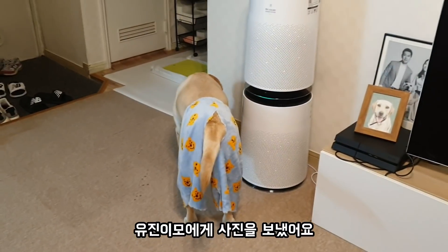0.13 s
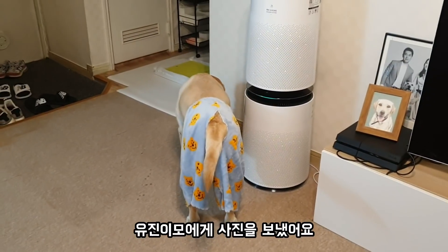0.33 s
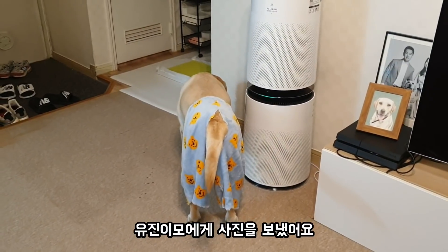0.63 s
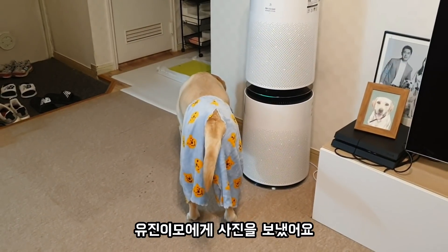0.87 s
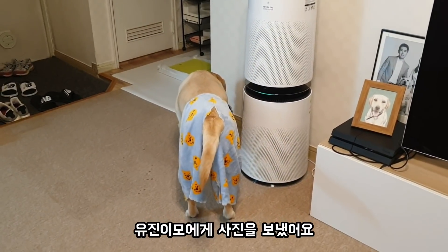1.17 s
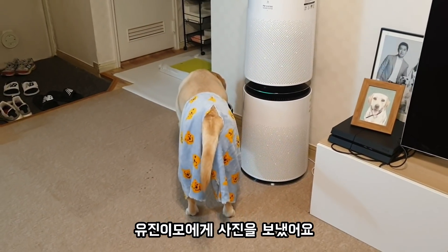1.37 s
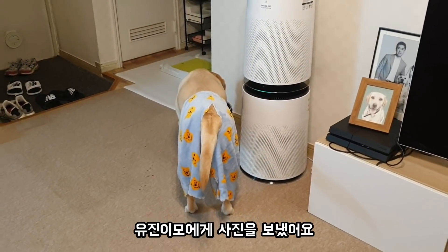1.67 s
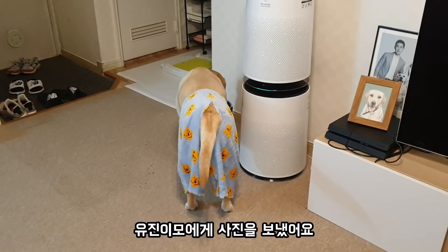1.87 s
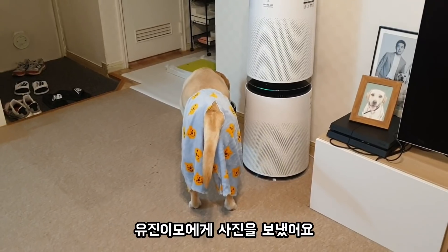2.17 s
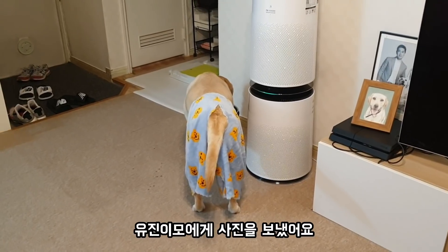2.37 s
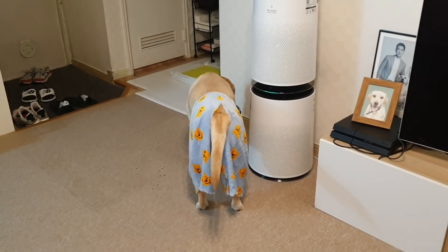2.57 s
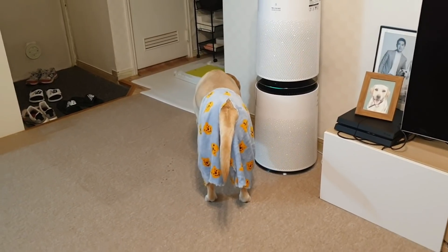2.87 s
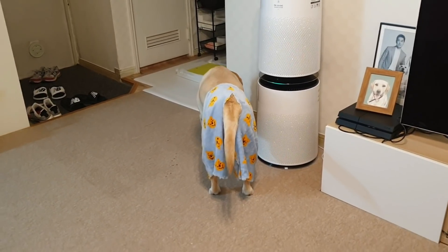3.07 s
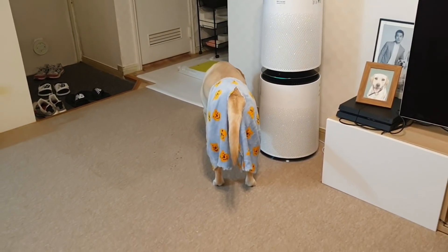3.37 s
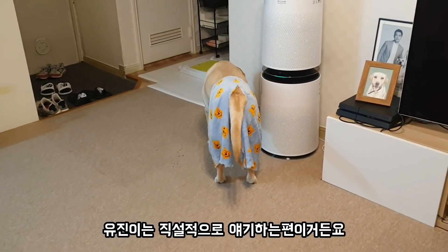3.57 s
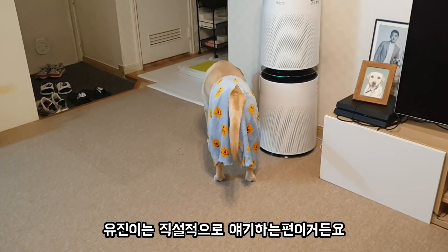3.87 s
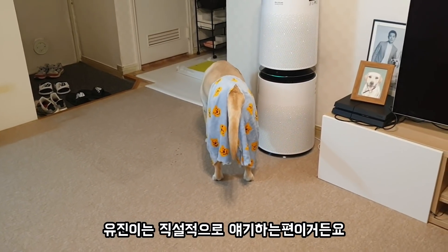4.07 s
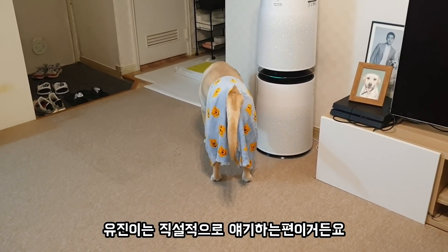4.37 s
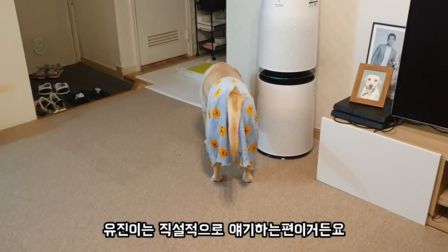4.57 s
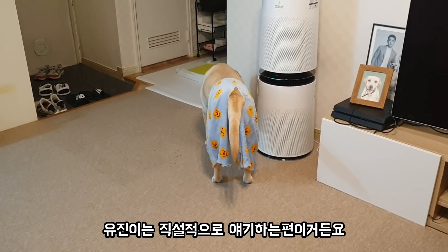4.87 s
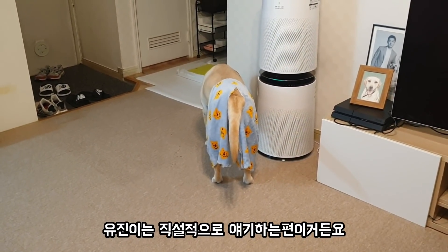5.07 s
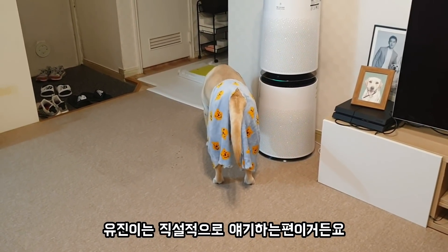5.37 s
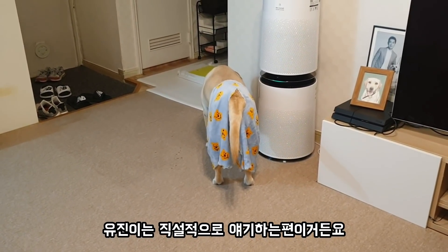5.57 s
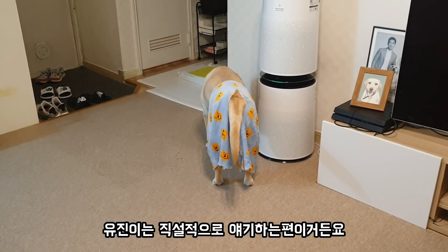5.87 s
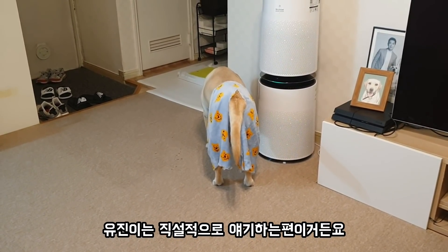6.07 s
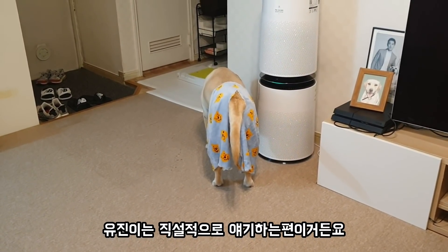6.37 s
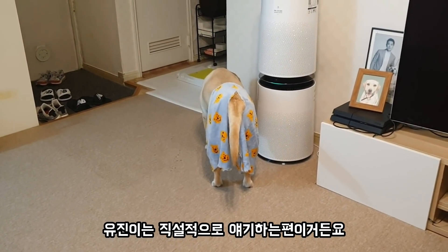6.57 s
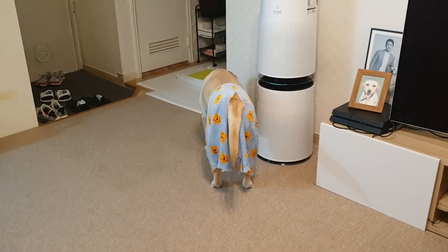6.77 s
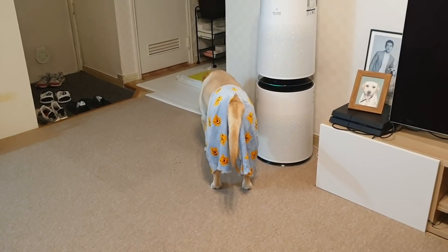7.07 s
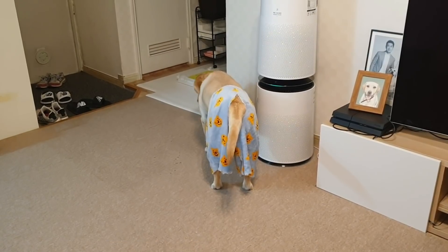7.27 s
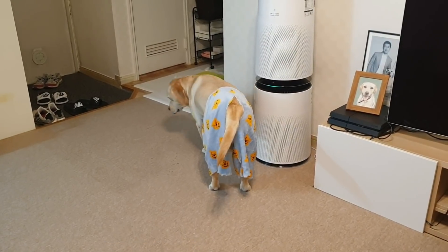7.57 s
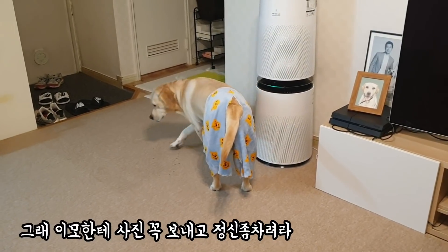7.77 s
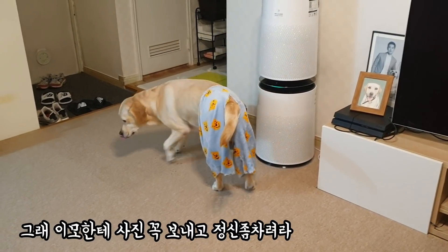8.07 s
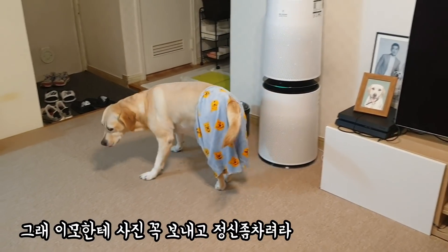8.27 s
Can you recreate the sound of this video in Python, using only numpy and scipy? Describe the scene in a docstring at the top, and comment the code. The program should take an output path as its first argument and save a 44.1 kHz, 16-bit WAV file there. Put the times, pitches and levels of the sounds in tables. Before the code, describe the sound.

Wet lip smacks and small bubbles, a short pause, then a dog laps water for about five seconds: tongue slaps, round gurgles, bright pops as the tongue pulls out, and lower plops of closing jaws. The bowl adds a slight ring. It stops, quietly licks its lips and moves with a faint rustle. Soft purifier airflow and occasional low booms sit beneath, in a small live room heard in stereo.

```python
"""A quiet living room: a dog laps water from a bowl, a little over two licks a second, then licks its lips.
In each lick the tongue slaps the water and stirs up big bubbles, then a cavity plops as it pulls back;
most licks end with a plop of the closing jaws, usually lower. Sprays are showers of ringing bubble grains,
plops are short gliding sines, and the bowl and the room colour them. A jacket rustles, low booms swell
and die away, and an air purifier hums: shaped noise with narrow resonances."""
import sys
import numpy as np
from scipy import signal
from scipy.fft import rfft, irfft, next_fast_len
from scipy.io import wavfile

SR = 44100
rng = np.random.default_rng(int(sys.argv[2]) if len(sys.argv) > 2 else 0)


def master_out(mix):
    """Clip the mix to full scale and print it as 16-bit PCM to the path in sys.argv[1]."""
    frames = np.transpose(np.atleast_2d(mix))
    ceiling = np.clip(frames, -1, 1)
    pcm = np.round(ceiling * 32767).astype(np.int16)
    wavfile.write(sys.argv[1], SR, pcm)


N = 370748   # samples, about 8.4 s
# All levels in dB are relative; a t60 is the time a sound takes to fall by 60 dB.


def lapping():
    """Slap, slosh, pull and jaw snap of the licks, with lip smacks and further bubbles."""
    sprays, gurgles, pockets = [], [], []
    tongue_slaps(sprays, gurgles, pockets)
    tongue_pulls(sprays, pockets)
    jaw_snaps(sprays, pockets)
    lip_smacks(sprays, gurgles)
    further_bubbles(pockets)
    return splashes(sprays) + sloshes(gurgles) + plops(pockets)


# The licks: the tongue brushes the water, slaps it and stirs it. Each row: start in seconds, slap in dB,
# body near 1 kHz in dB, fizz above 8 kHz in dB, rise in seconds, fade t60 in seconds, brush in dB,
# air pocket in dB, pocket pitch in Hz, slosh in dB, slosh pitch in Hz.
LICKS = [(1.287, -47.5, 4.5, -0.5, 0.0016, 0.16, -49.5, -45, 900, -42, 510),
         (1.690, -52, 2, 2, 0.012, 0.46, -46.5, -55, 735, -54.5, 420),
         (2.176, -39, 3.5, -3.5, 0.0042, 0.17, -61, -32, 920, -45, 617),
         (2.574, -41, 4.5, 6.5, 0.0094, 0.28, -79, -24, 1424, -35, 322),
         (3.093, -35, 1, 8, 0.019, 0.13, -53.5, -34.5, 1160, -37.5, 469),
         (3.499, -37, -4.5, 8, 0.00096, 0.13, -57.5, -29, 1570, -37.5, 472),
         (4.007, -41, 0, -1, 0.00069, 0.15, -51, -50, 1130, -40, 460),
         (4.409, -50.5, 1.5, 6, 0.017, 0.47, -62, -54, 1785, -46.5, 379),
         (4.908, -39.5, 0.5, -4, 0.0074, .2, -54.5, -36.5, 2760, -38.5, 350),
         (5.329, -47, -1, 2, 0.021, 0.23, -53.5, -52, 1340, -42.5, 452),
         (5.841, -36, -2, -15, 0.0062, 0.18, -77, -33.5, 920, -40.5, 580),
         (6.260, -41.5, -7, -16, 0.0015, 0.29, -49, -29.5, 1213, -45.5, 555)]
# Colour of the brush and of the slap, in dB near 1, 2.2, 5 and 11 kHz.
BRUSH_COLOUR_DB = (-1, 5, -16, -10)
SLAP_COLOUR_DB = (0, 2.5, -.5, -8)
BRUSH_LEAD_S, BRUSH_RISE_S, BRUSH_T60_S = 0.021, 0.013, 0.22   # light contact just ahead of the slap
POCKET_T60_S = 0.019   # ring of the air pocket trapped under the tongue
SLOSH_LAG_S, SLOSH_T60_S = 0.014, 0.093   # the water moves just after the slap
DEEP_DB, DEEP_HZ = -8, 256   # a deeper gurgle under each slosh


def tongue_slaps(sprays, gurgles, pockets):
    """The tongue sprays droplets, traps an air pocket and stirs up large bubbles."""
    for (s, db, body_db, fizz_db, rise, fade, brush_db,
         pocket_db, pocket_hz, slosh_db, slosh_hz) in LICKS:
        slap_colour = np.add(SLAP_COLOUR_DB, [body_db, 0, 0, fizz_db])
        sprays.append((s - BRUSH_LEAD_S, brush_db, *BRUSH_COLOUR_DB, BRUSH_RISE_S, BRUSH_T60_S))
        sprays.append((s, db, *slap_colour, rise, fade))
        pockets.append((s, pocket_db, pocket_hz, POCKET_T60_S))
        gurgles.append((s + SLOSH_LAG_S, slosh_db, slosh_hz, SLOSH_T60_S))
        gurgles.append((s + SLOSH_LAG_S, slosh_db + DEEP_DB, DEEP_HZ, SLOSH_T60_S))


# The pulls, 40 to 80 ms after the slaps. Each row: start in seconds, spray in dB, brightest pitch in Hz,
# fade t60 in seconds, plop in dB, plop pitch in Hz, ring t60 in seconds.
PULLS = [(1.345, -45, 2200, 0.24, -31.5, 1620, 0.014), (1.730, -61, 1500, 0.18, -29, 1350, 0.017),
         (2.243, -36, 4220, .11, -37, 1770, 0.034), (2.637, -36.5, 2400, 0.16, -21.5, 1880, 0.0099),
         (3.155, -40.5, 5760, 0.2, -31, 1910, 0.0096), (3.577, -42, 3100, 0.23, -26, 1590, 0.0068),
         (4.076, -40, 2200, 0.11, -31.5, 1474, 0.022), (4.485, -49, 3200, 0.26, -31, 1820, 0.016),
         (4.972, -43, 4600, 0.2, -37, 1810, 0.016), (5.386, -48.5, 4500, 0.2, -25, 1630, 0.0054),
         (5.923, -43, 2400, 0.16, -44, 3070, .015), (6.325, -48.5, 2400, 0.17, -20.5, 1690, 0.0086)]
# Colour of the falling water before its brightest pitch is set, in dB near 1, 2.2, 5 and 11 kHz.
PULL_COLOUR_DB = (-2.5, -1, -2, -1)
PULL_RISE_S = 0.002


def tongue_pulls(sprays, pockets):
    """The tongue pulls out: the cavity behind it plops and water falls back as spray."""
    for s, spray_db, brightest_hz, fade, plop_db, hz, ring in PULLS:
        sprays.append((s, spray_db, *focused(PULL_COLOUR_DB, brightest_hz), PULL_RISE_S, fade))
        pockets.append((s, plop_db, hz, ring))


# The jaws, about 150 ms after the slaps. Each row: start in seconds, spray in dB, plop in dB,
# plop pitch in Hz, ring t60 in seconds.
JAWS = [(1.440, -51.5, -22.5, 1290, 0.0044), (1.821, -47.5, -30, 1010, 0.0086),
        (2.327, -43.5, -41.5, 1430, 0.017), (2.718, -42.5, -22, 1270, 0.0065),
        (3.243, -41.5, -32.5, 1147, 0.013), (4.154, -39.5, -34.5, 1170, 0.017),
        (5.067, -53.5, -28.5, 1270, 0.011), (5.486, -49.5, -33.5, 2050, 0.0082),
        (5.997, -66, -22.5, 990, 0.0037), (6.419, -49, -41, 1750, 0.014)]
# Colour of the jaw spray, in dB near 1, 2.2, 5 and 11 kHz.
JAW_COLOUR_DB = (4.5, 1, -4, -8.5)
JAW_RISE_S, JAW_T60_S = 0.0098, 0.083


def jaw_snaps(sprays, pockets):
    """The jaws shut on the water with a spray and a double plop of enclosed air."""
    for s, spray_db, plop_db, hz, ring in JAWS:
        sprays.append((s, spray_db, *JAW_COLOUR_DB, JAW_RISE_S, JAW_T60_S))
        pockets += paired(s, plop_db, hz, ring)


# Wet lip smacks before and after drinking. Each row: start in seconds, level in dB, brightest pitch in Hz,
# fizz above 8 kHz in dB, rise in seconds.
SMACKS = [(0.018, -48, 1000, 13, 0.013), (0.463, -53.5, 6000, 4, 0.016), (0.501, -46, 4080, -7, 0.0013),
          (0.810, -51.5, 899, 12, 0.0051), (0.857, -44.5, 3750, 2.5, .006), (0.899, -47, 2560, -12, 0.0048),
          (6.832, -51, 2720, 2.5, 0.0059), (7.008, -57.5, 5000, -8, 0.0058), (7.348, -61, 3800, 0, 0.017),
          (7.459, -57, 3400, -22, .01), (7.794, -55, 3400, 1.5, 0.011), (7.939, -60, 4450, 5.5, 0.0019),
          (8.276, -53.5, 5240, -2, 0.0045)]
# Colour of the smacks before their brightest pitch is set, in dB near 1, 2.2, 5 and 11 kHz.
SMACK_COLOUR_DB = (-5, -0.5, 0.5, -1.5)
SMACK_T60_S = 0.24
MOUTH_DB, MOUTH_HZ, MOUTH_T60_S = -14, 655, 0.41   # each smack also gurgles in the mouth


def lip_smacks(sprays, gurgles):
    """Wet lips part in a spray of fine bubbles over a gurgle in the mouth."""
    for s, db, brightest_hz, fizz_db, rise in SMACKS:
        colour = focused(SMACK_COLOUR_DB, brightest_hz) + [0, 0, 0, fizz_db]
        sprays.append((s, db, *colour, rise, SMACK_T60_S))
        gurgles.append((s, db + MOUTH_DB, MOUTH_HZ, MOUTH_T60_S))


# Further bubbles, within the licks and between them. Each row: start in seconds, level in dB, pitch in Hz.
FURTHER_BUBBLES = [(0.055, -38, 1365), (0.273, -47, 1390), (0.502, -37.5, 1775), (0.710, -45, 1432),
                   (0.723, -44, 744), (1.349, -36.5, 2540), (1.694, -38, 8290), (2.578, -24.5, 977),
                   (3.504, -33.5, 6410), (4.006, -39.5, 4820), (4.08, -38.5, 2850), (5.848, -29, 2680),
                   (5.886, -34, 990), (5.925, -47, 8000), (6.838, -53, 3120), (6.840, -49.5, 1110),
                   (7.460, -56.5, 2480), (7.463, -48.5, 4490), (7.789, -52.5, 3150), (7.973, -53, 1360),
                   (8.207, -45, 6770), (8.272, -42.5, 1440)]
FURTHER_RING_S = 0.017   # t60


def further_bubbles(pockets):
    """Further bubbles, within the licks and between them, each with a higher, weaker follower."""
    for s, db, hz in FURTHER_BUBBLES:
        pockets += paired(s, db, hz, FURTHER_RING_S)


GULP_LAG_S, GULP_DB, GULP_OCTAVES = 0.018, -7, 0.15


def paired(s, db, hz, ring):
    """An air pocket and the weaker, higher one that follows it."""
    return [(s, db, hz, ring), (s + GULP_LAG_S, db + GULP_DB, hz * 2 ** GULP_OCTAVES, ring)]


# Anchor pitches of every spray colour, in Hz.
COLOUR_HZ = [1000, 2200, 5000, 11000]
FOCUS_DB_PER_OCTAVE = 5


def focused(colour_db, brightest_hz):
    """Tilt a spray's colour down on both sides of its brightest pitch."""
    octaves_away = np.abs(np.log2(np.array(COLOUR_HZ) / brightest_hz))
    return np.array(colour_db) - FOCUS_DB_PER_OCTAVE * octaves_away


def splashes(sprays, level_db=-12.5, clump_db=4.5, clump_s=0.0049, patchy_db=2.0,
             touch_s=0.014, touch_db=-15, top_db=-4, smack_db=-2.0, smack_s=0.0021):
    """A soft touch, then a smack: a quickly fading shower of tiny bubbles and droplets."""
    out, t = np.zeros(N), seconds(0.3)
    colour_hz = COLOUR_HZ + [15000]
    since = np.maximum(t - touch_s, 0)   # time since the smack
    touch = amp(touch_db) * np.minimum(t / touch_s, 1) ** 2
    smack = 1 + amp(smack_db) * np.exp(-since / smack_s)
    for s, peak_db, *colour_db, rise, fade in sprays:
        pitches = np.geomspace(620, 14500, 26) * 2 ** rng.uniform(-0.06, 0.06, 26)
        onset = 1 - np.exp(-since / max(rise, 1e-4))
        envelope = (touch + smack * onset) * amp(-60 * since / max(fade, 0.01))
        energy = np.sqrt(np.mean(envelope ** 2))
        envelope = envelope * clumping(t, clump_db, clump_s)
        colour = np.interp(np.log(pitches), np.log(colour_hz), colour_db + [colour_db[-1] + top_db])
        patchy_colour = colour + patchy_db * rng.standard_normal(len(pitches))
        for hz, db in zip(pitches, patchy_colour):
            # bubbles of each size come in flurries of their own, so the colour keeps changing
            flurries = energy * rms_one(envelope * clumping(t, depth_db=3.0, clump_s=0.01254))
            shower = grains(flurries, hz, per_s=210, cycles=29.0, spread_db=6.0)
            add(out, s - touch_s, amp(peak_db + level_db + db) * shower)
    return out


def clumping(t, depth_db, clump_s, settle_s=0.029):
    """Bubbles burst in clumps: a random gain whose swings grow to full depth over the first moments."""
    swing_db = depth_db * np.minimum(t / settle_s, 1) ** 2
    jumps = np.interp(t, np.arange(200) * clump_s, rng.standard_normal(200))
    return amp(swing_db * (jumps - 0.25))


def sloshes(gurgles, level_db=-11, rise=0.0026, span_octaves=0.49, glop_db=-1, glop_t60=0.07):
    """The tongue closes one large cavity with a round glop; other bubbles gurgle around its pitch."""
    out, t = np.zeros(N), seconds(0.3)
    for s, peak_db, hz, fade in gurgles:
        add(out, s, amp(peak_db + glop_db) * bubble(hz, glop_t60))
        envelope = (1 - np.exp(-t / rise)) * amp(-60 * t / max(fade, 0.01))
        for octave in np.linspace(-span_octaves, span_octaves, 5):
            gurgle = grains(envelope, hz * 2 ** octave, per_s=220, cycles=13, spread_db=3.0)
            add(out, s, amp(peak_db + level_db) * gurgle)
    return signal.sosfilt(signal.butter(2, 1100, fs=SR, output="sos"), out)   # keep it dark


def plops(pockets, level_db=6.0, rebound_s=0.004, rebound_db=-3, rebound_octaves=0.21,
          fragment_db=-12, scatter_octaves=0.496, breakup_s=0.024, count=5):
    """Each pocket pops, rebounds a little higher, and breaks up into weaker bubbles of other sizes."""
    out = np.zeros(N)
    for s, db, hz, t60 in pockets:
        add(out, s, amp(db + level_db) * bubble(hz, t60))
        rebound = bubble(hz * 2 ** rebound_octaves, 0.5 * t60)
        add(out, s + rebound_s, amp(db + rebound_db) * rebound)
        octaves = np.linspace(-scatter_octaves, scatter_octaves, count) + rng.normal(0, 0.021, count)
        for delay, octave in zip(rng.random(count), octaves):
            fragment = bubble(hz * 2 ** octave, t60)
            add(out, s + delay * breakup_s, amp(db + fragment_db - 2.7 * delay) * fragment)
    return out


def bubble(hz, t60, glide_octaves=0.12):
    """An air pocket opens within about a cycle, rings briefly and rises in pitch."""
    t = seconds(0.08)
    pitch = hz * 2 ** (glide_octaves * (np.minimum(t / t60, 1) - 0.2))
    envelope = (1 - np.exp(-t * hz)) * amp(-60 * t / t60)
    return envelope * np.sin(2 * np.pi * np.cumsum(pitch) / SR)


def grains(envelope, hz, per_s, cycles, spread_db):
    """Grains of one pitch ring at random, 60 dB down after the given cycles, with the envelope's energy."""
    size = len(envelope)
    strength = amp(spread_db * np.minimum(rng.exponential(1, size), 3)) * rng.choice([-1, 1], size)
    clicks = envelope * strength * (rng.random(size) < per_s / SR)
    sound = resonate(clicks, hz, np.log(1000) / np.pi * hz / cycles)
    return rms_one(sound) * np.sqrt(np.mean(envelope ** 2))


# Resonances of the bowl. Each row: pitch in Hz, width in Hz, gain in dB.
BOWL_MODES = [(337, 160, -0.5), (484, 85, 1), (599.5, 8.3, -6.5), (930, 22, -4.5), (1160, 30, -10),
              (2600, 88, -16), (2860, 100, -12), (3220, 73, -7), (3790, 69, -55), (6500, 71, -1),
              (8560, 140, -4), (10600, 180, -2), (12800, 230, -10)]


def bowl(water):
    """The bowl rings along with the water at its own resonances."""
    return water + sum(amp(db) * resonate(water, hz, width) for hz, width, db in BOWL_MODES)


# Soft rustles as the dog moves in its jacket. Each row: start in seconds, level in dB.
RUSTLES = [(0.146, -71.5), (0.246, -71), (0.531, -68), (6.925, -78), (7.294, -74), (8.082, -68),
           (8.349, -66)]
RUSTLE_S, RUSTLE_HZ = 0.097, 6500


def rustles():
    """Cloth slides in short swells of fine crackle."""
    out = np.zeros(N)
    swell = np.hanning(int(RUSTLE_S * SR))
    for s, db in RUSTLES:
        add(out, s, amp(db) * grains(swell, RUSTLE_HZ, per_s=4000, cycles=3.0, spread_db=10.0))
    return out


# Low booms. Each row: start in seconds, level in dB.
BOOMS = [(2.779, -56.5), (3.079, -58.5), (3.699, -58.5), (4.099, -62), (4.93, -60.5), (5.534, -55.5),
         (6.74, -48), (7.53, -60), (7.91, -52.5)]
BOOM_HZ, BOOM_T60_S = 59.8, 0.97


def booms(rise=0.0094):
    """Low booms near 60 Hz swell fast and die slowly: decaying sines, leaning left."""
    out, t = np.zeros(N), seconds(1)
    boom = (1 - np.exp(-t / rise)) * np.sin(2 * np.pi * BOOM_HZ * t)
    for s, db in BOOMS:
        add(out, s, amp(db - 60 * t / BOOM_T60_S) * boom)
    return out * pan(3.0)


# Nearby surfaces. Each row: left delay in seconds, right delay in seconds, gain in dB.
REFLECTIONS = [(.00102, 0.00078, -5.5), (.00207, 0.00096, -6), (.0044, 0.0051, -11.5), (.0051, 0.0043, -7),
               (0.0089, 0.011, -17), (0.0143, 0.017, -6.5)]


def room(x, direct_db=-4.5, move_s=0.025, count=6):
    """Direct sound, dull first echoes and a diffuse pattern that changes as the head and the water move."""
    dull = signal.lfilter([0.6], [1, -0.4], x + 1e-18)
    out = np.array([x, x])
    for *delays, db in REFLECTIONS:
        for side, delay in enumerate(delays):
            add(out[side], delay, amp(db) * dull)
    # the sound wanders between several diffuse responses at constant power
    knots, time = np.arange(1000) * move_s, np.arange(N) / SR
    shares = np.array([np.interp(time, knots, rng.random(len(knots)) ** 4) for _ in range(count)])
    shares = shares / np.sqrt(np.sum(shares ** 2, axis=0))
    diffuse = sum(signal.oaconvolve((x * share)[None], diffuse_response(), axes=1)[:, :N]
                  for share in shares)
    return amp(direct_db) * out + diffuse


# How long the room rings. Each row: frequency in Hz, t60 in seconds.
ROOM_T60 = [(150, 0.66), (500, 0.33), (1400, 0.34), (4000, 0.31), (10000, 0.31), (16000, 0.35)]


def diffuse_response(tail_db=-2.0, build_s=0.0058, early_db=-7, early_t60=0.018):
    """Dense, quickly fading early scatter, and a tail whose decay time depends on frequency."""
    t = seconds(0.5)
    tail, early = 0, 0
    for hz, band in diffuse_bands(len(t)):
        tail = tail + band * amp(-60 * t / at_hz(ROOM_T60, hz))
        early = early + band * amp(-60 * t / early_t60)
    opening = 1 - np.exp(-t / build_s)
    both = amp(tail_db) * rms_one(tail * opening) + amp(early_db) * rms_one(early * opening)
    return both / np.sqrt(len(t))


# How alike the two sides of diffuse sound are. Each row: frequency in Hz, left-right correlation from 0 to 1.
LIKENESS = [(60, 0.65), (250, 1), (500, 0.73), (1000, 0.11), (2000, 0), (16000, 0)]


def diffuse_bands(size):
    """Third-octave bands of stereo noise, most alike on both sides in the bass: yields (Hz, band)."""
    edges = 22 * 2 ** (np.arange(30) / 3)
    white = rng.standard_normal((2, 2, size + SR // 4))   # extra length lets the filters settle
    for k, (low, high) in enumerate(zip(edges, edges[1:])):
        band_filter = signal.butter(2, [low, high], "band", fs=SR, output="sos")
        mid, side = signal.sosfilt(band_filter, white[k % 2])[:, -size:]
        hz = np.sqrt(low * high)
        alike = np.clip(at_hz(LIKENESS, hz), -1, 1)
        yield hz, np.sqrt(1 + alike) * mid + np.sqrt(1 - alike) * side * [[1], [-1]]


# Stereo colour of the bowl and the dog. Each row: frequency in Hz, left minus right in dB.
WATER_BALANCE = [(200, 0), (700, 2.5), (1500, 2.5), (3000, -1.7), (5000, 1), (6400, -1.5), (8400, 0.5),
                 (10400, -10), (15000, -5.5)]


def toward_microphones(x):
    """The two sides hear the bowl in different colours, the right one brighter."""
    size = next_fast_len(N)
    ratio = amp(at_hz(WATER_BALANCE, np.maximum(np.fft.rfftfreq(size, 1 / SR), 1)))
    gains = np.array([ratio, np.ones_like(ratio)]) * np.sqrt(2 / (1 + ratio ** 2))
    return irfft(rfft(x, size) * gains, size)[:, :N]


# Air noise of the purifier and the room. Each row: frequency in Hz, level in dB per Hz.
AIR = [(15, -50), (25, -18), (55, -7.5), (107, -7.5), (297, -5), (433, -11.5), (469, -21.5), (523, -15.5),
       (1110, -20), (1530, -26.5), (2490, -30), (2850, -33), (6920, -39.5), (8580, -40.5), (15500, -35.5)]
# Stereo colour of that noise. Each row: frequency in Hz, left minus right in dB.
AIR_BALANCE = [(60, 5), (250, -0.6), (750, 9.5), (1200, 1), (1800, 7.5), (3000, 1.5), (14000, 1)]
# Narrow hums and a faint whine. Each row: pitch in Hz, width in Hz, level in dB relative to the air noise,
# left minus right in dB.
HUMS = [(62.2, 6, -14.5, 10.5), (219, 22, -10.5, 14.5), (299.6, 25, -11.5, 9), (8280, 190, -28.5, 29)]
# Slow drift of the purifier and air noise. Each row: time in seconds, level in dB.
AIR_LEVEL = [(0.0, -63), (0.37, -61.5), (0.89, -64.5), (2.36, -62), (3.6, -64), (3.75, -65), (6.32, -64),
             (7.33, -65), (8.41, -63)]


def purifier(level_db=2.5):
    """Smooth air noise, with narrow hums made by resonating noise."""
    air = sum(amp(at_hz(AIR, hz)) * pan(at_hz(AIR_BALANCE, hz)) * band
              for hz, band in diffuse_bands(N))
    hums = sum(amp(db) * pan(side_db) * rms_one(resonate(rng.standard_normal(N), hz, width))
               for hz, width, db, side_db in HUMS)
    drift_db = np.interp(np.arange(N) / SR, *np.transpose(AIR_LEVEL))
    return amp(level_db + drift_db) * rms_one(rms_one(air) + hums)


def resonate(x, hz, width_hz):
    """A two-pole resonance with gain 1 at its top."""
    r = np.exp(-np.pi * width_hz / SR)
    feedforward = np.array([1, 0, -1]) * (1 - r * r) / 2
    feedback = [1, -2 * r * np.cos(2 * np.pi * hz / SR), r * r]
    return signal.lfilter(feedforward, feedback, x + 1e-18)


def amp(db):
    """Decibels to gain."""
    return 10 ** (np.asarray(db) / 20)


def rms_one(x):
    """Scale to an rms of 1."""
    return x / np.sqrt(np.mean(x ** 2) + 1e-20)


def at_hz(points, hz):
    """Read a table on a log-frequency axis."""
    freqs, values = np.transpose(points)
    return np.interp(np.log(hz), np.log(freqs), values)


def pan(balance_db):
    """Left and right gains for a level difference, left minus right."""
    gains = amp(np.array([[0.5], [-0.5]]) * balance_db)
    return rms_one(gains)


def seconds(length):
    """A time axis in seconds."""
    return np.arange(int(length * SR)) / SR


def add(out, s, sound):
    """Mix a sound in at time s."""
    start = max(int(s * SR), 0)
    out[start:start + len(sound)] += sound[:N - start]


def scene():
    """Water passes through the bowl, joins the rustles in the room, and sits over the purifier and booms."""
    water = bowl(lapping())
    dog = toward_microphones(room(water + rustles()))
    return dog + purifier() + booms()


CUTOFF_HZ = 15680


def record(dry):
    """The top is cut steeply."""
    return signal.sosfilt(signal.ellip(14, 0.1, 80, CUTOFF_HZ, fs=SR, output="sos"), dry)


dry = scene()
out = record(dry)
master_out(out)
```